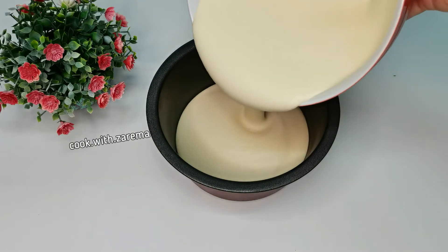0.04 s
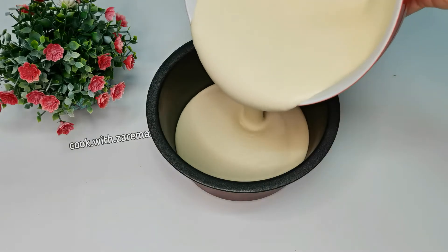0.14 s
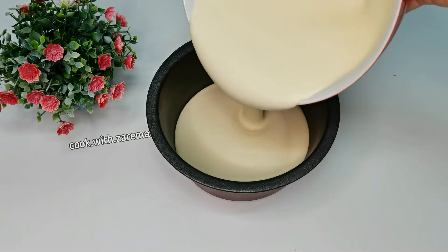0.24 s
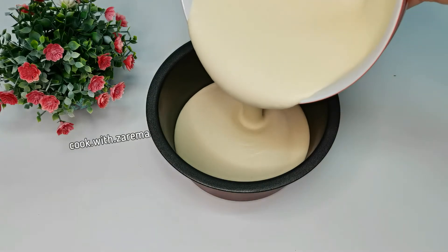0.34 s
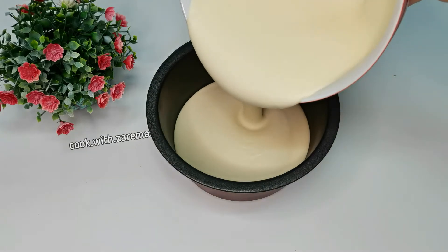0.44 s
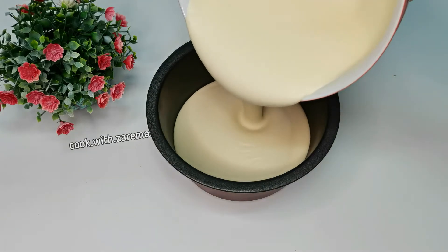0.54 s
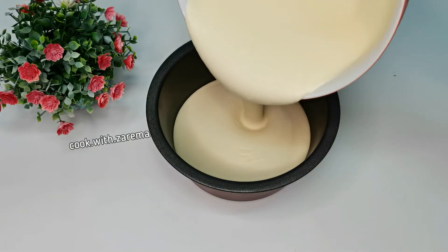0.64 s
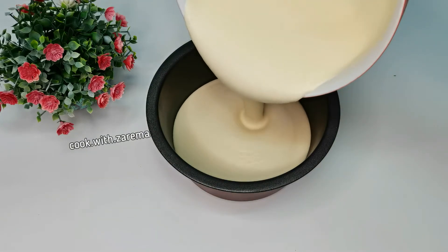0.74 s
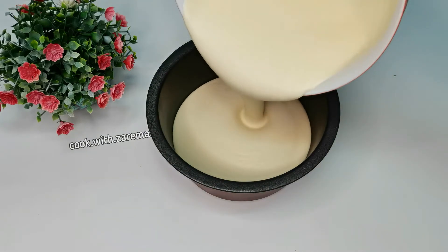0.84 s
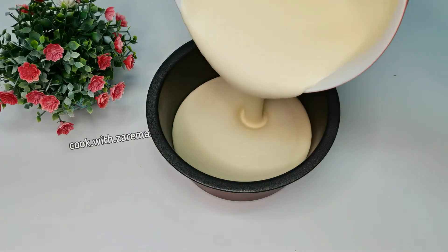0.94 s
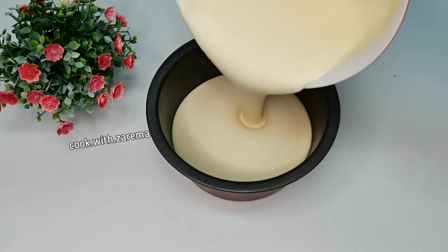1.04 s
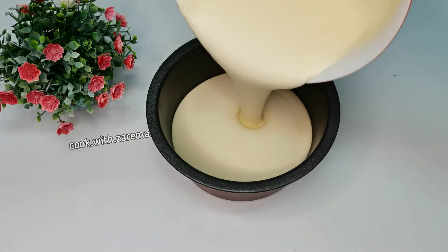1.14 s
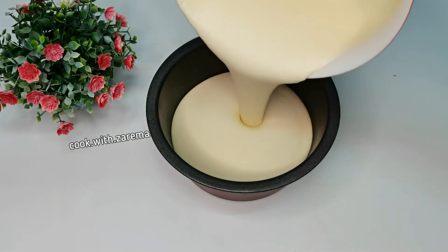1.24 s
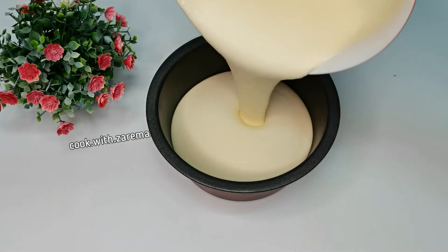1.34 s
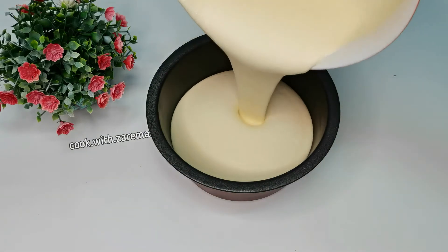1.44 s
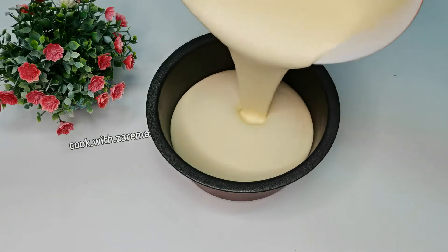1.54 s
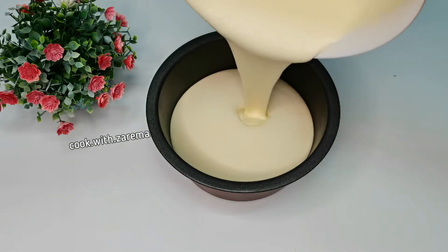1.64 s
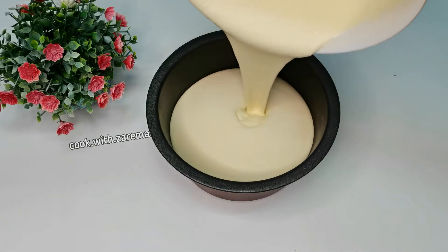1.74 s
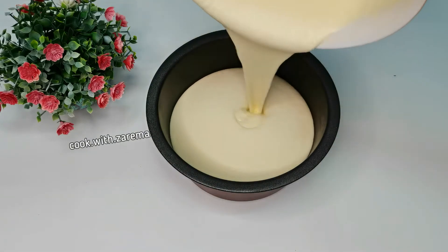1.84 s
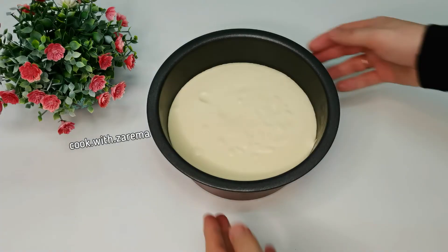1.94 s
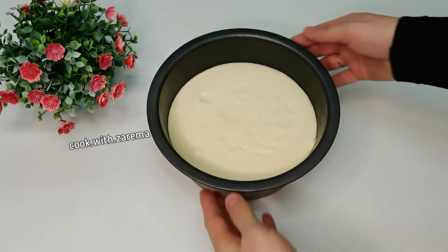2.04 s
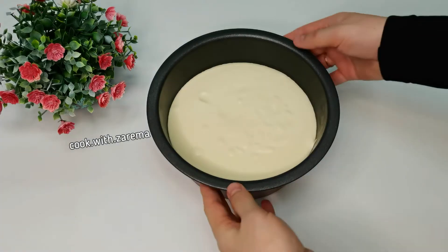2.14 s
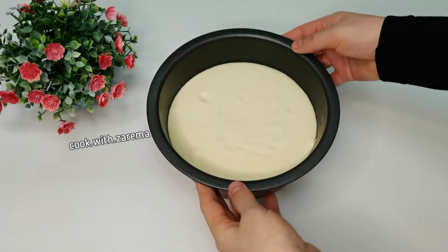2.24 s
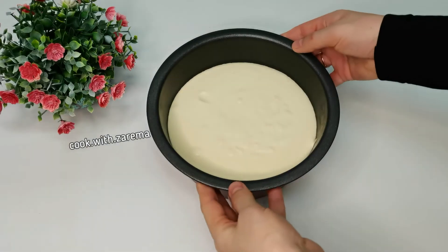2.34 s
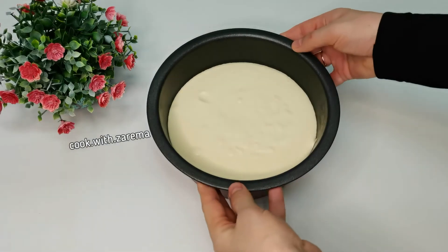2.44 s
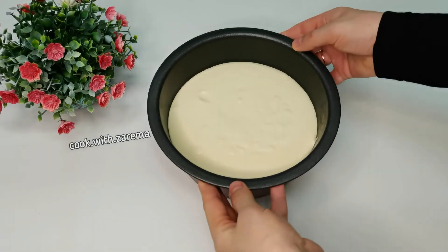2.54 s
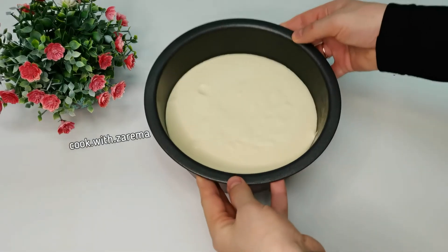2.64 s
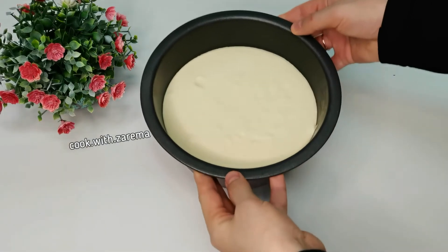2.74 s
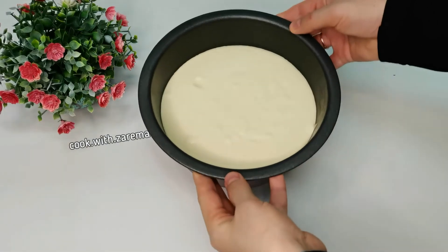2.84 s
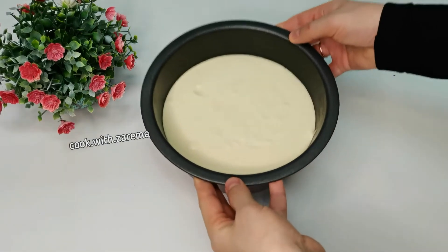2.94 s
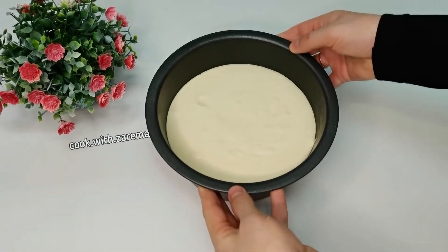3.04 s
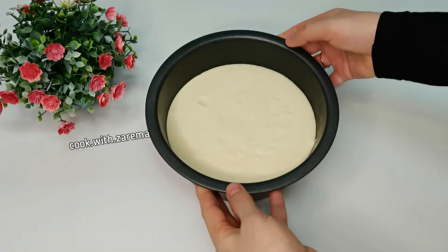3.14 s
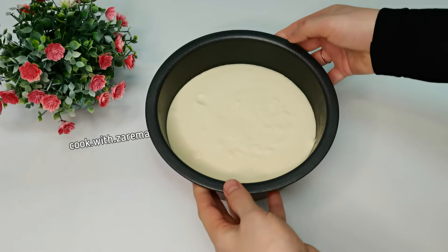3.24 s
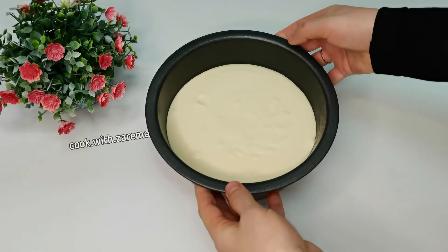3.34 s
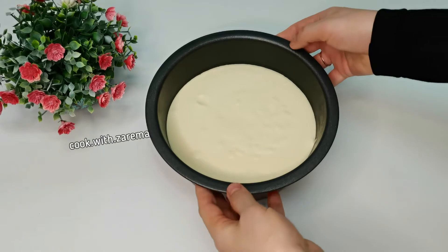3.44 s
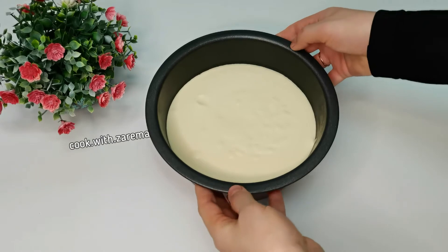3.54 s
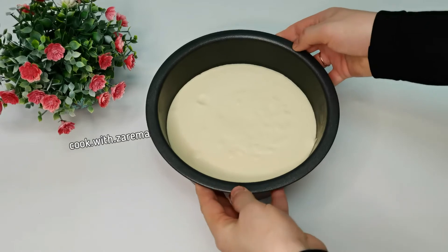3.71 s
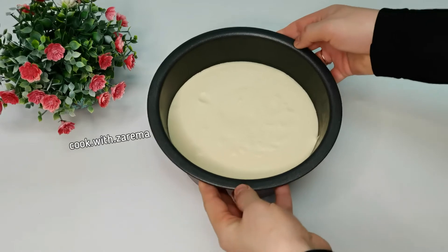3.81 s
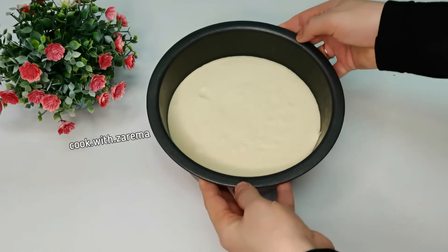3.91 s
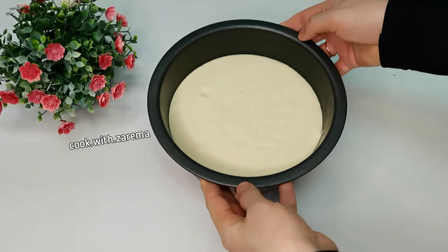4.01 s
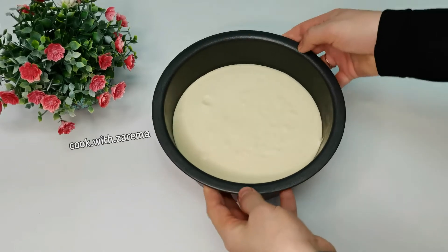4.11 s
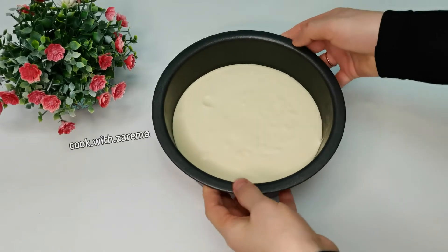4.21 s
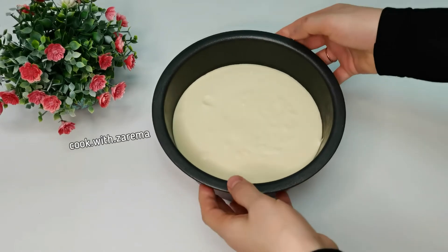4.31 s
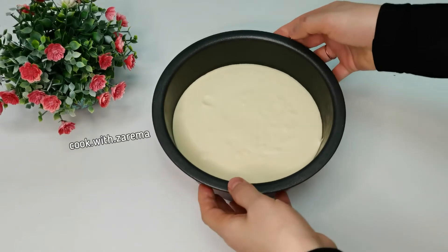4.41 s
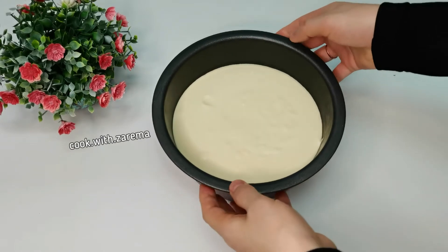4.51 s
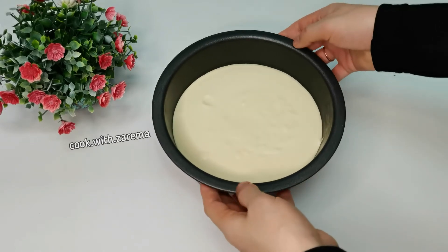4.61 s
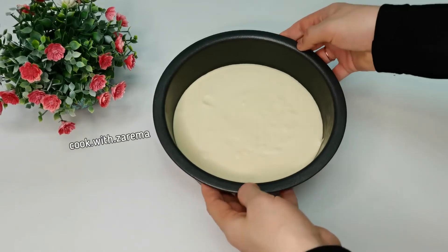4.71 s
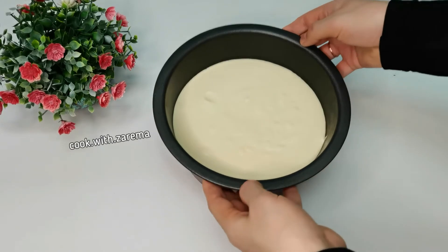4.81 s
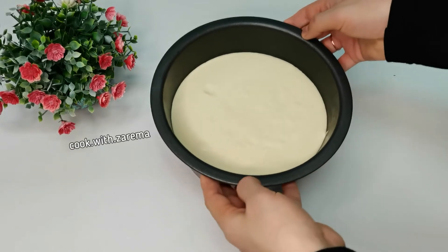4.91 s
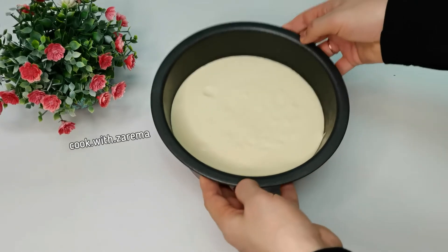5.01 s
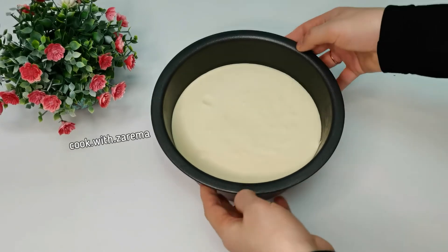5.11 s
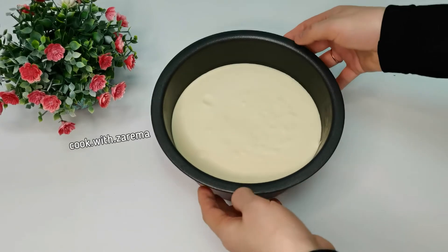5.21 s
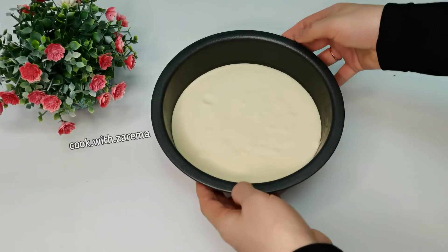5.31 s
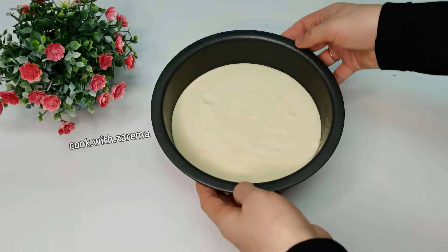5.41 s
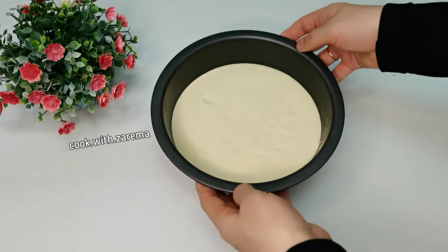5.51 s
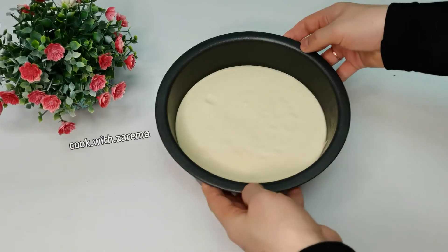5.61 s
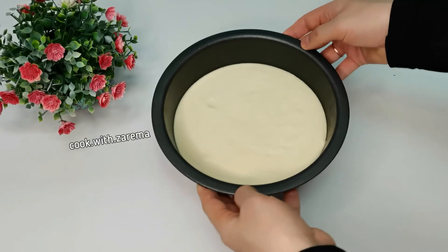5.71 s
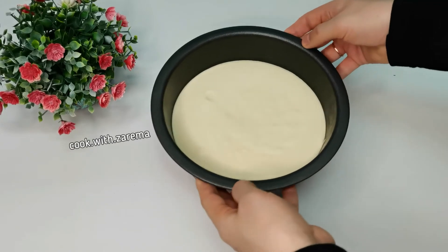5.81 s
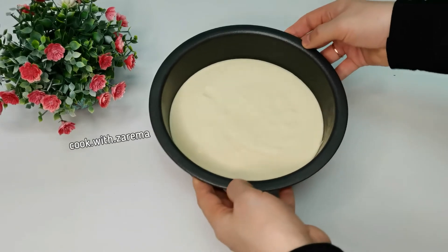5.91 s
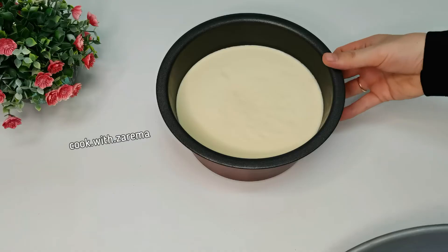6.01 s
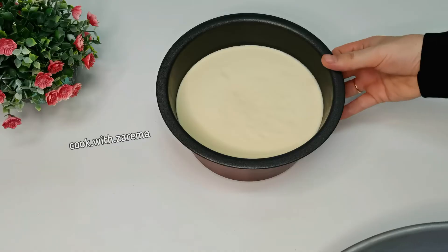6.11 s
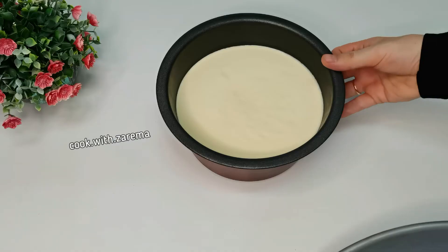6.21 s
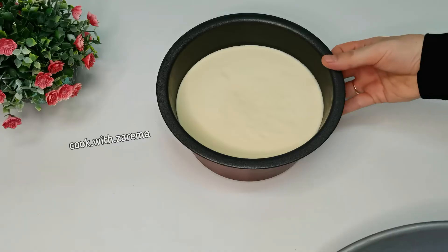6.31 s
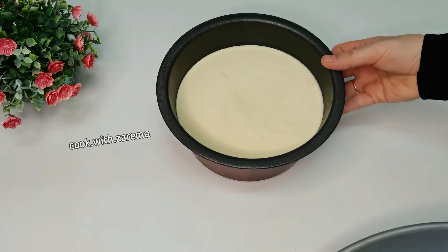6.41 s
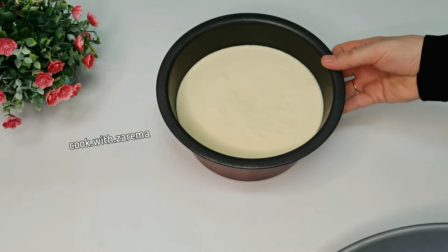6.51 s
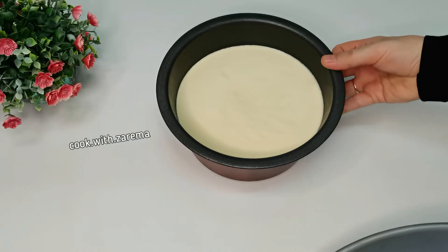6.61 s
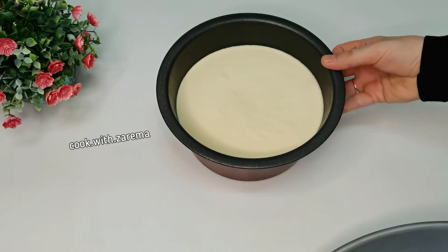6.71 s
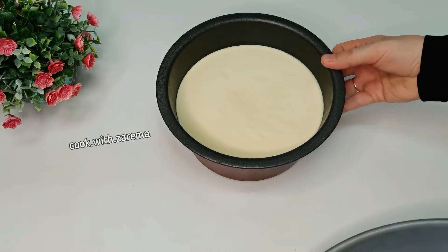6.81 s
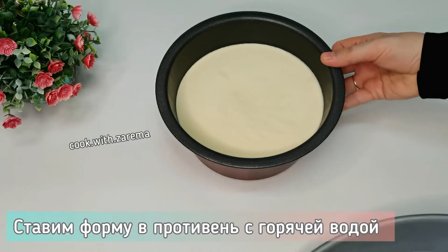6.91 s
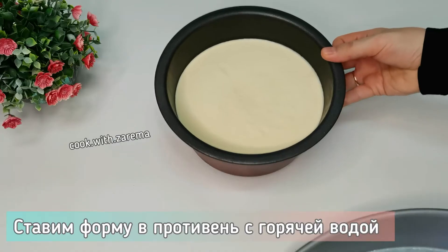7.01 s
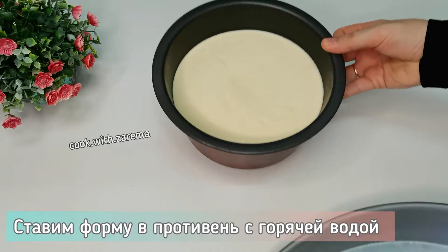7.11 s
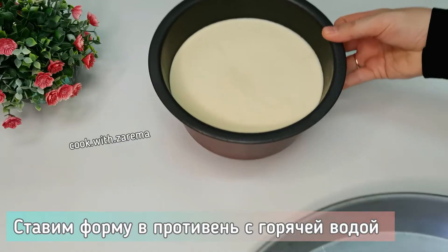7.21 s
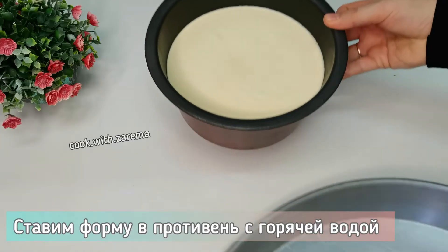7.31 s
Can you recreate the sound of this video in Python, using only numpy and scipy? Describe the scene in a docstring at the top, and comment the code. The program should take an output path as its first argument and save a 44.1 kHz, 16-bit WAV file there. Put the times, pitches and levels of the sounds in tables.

```python
"""An appliance hums, whistles and whines faintly in a bare kitchen: noise, motor lines and a wavering drone.
Hands rustle as they reach for a metal cake pan full of batter: two soft swells of hiss.
The pan is knocked down three times on a table: a low thud, a rattle of tiny contacts and ringing modes,
with echoes and a diffuse tail on thud and rattle; a limiter ducks the loud blows.
The background sinks a step after each knock and comes back near the end with a stronger whine and whistle."""
import sys
import numpy as np
from scipy import signal
from scipy.fft import rfft, irfft
from scipy.io import wavfile
from scipy.ndimage import uniform_filter1d, minimum_filter1d

SR = 44100
rng = np.random.default_rng(int(sys.argv[2]) if len(sys.argv) > 2 else 0)


def inscribe(sig):
    """Save sig as 16-bit PCM at rate SR to the path in sys.argv[1].

    A 1-D sig is mono; a 2-D sig holds one channel per row.
    Samples are clipped to [-1, 1] before scaling.
    """
    pcm = np.round(np.clip(np.atleast_2d(sig).T, -1, 1) * 32767)
    wavfile.write(sys.argv[1], SR, pcm.astype(np.int16))


N = 324135
TIME = np.arange(N) / SR
HZ = np.maximum(np.fft.rfftfreq(2 * SR, 1 / SR), 1)   # bins of a two-second spectrum
FINE_HZ = np.maximum(np.fft.rfftfreq(N, 1 / SR), 1)   # bins of the whole scene

# Pan base on the table. Each row: start in seconds, thud level in dB, contact brightness in Hz,
# pan ring in dB, table boom in dB.
KNOCK_ROWS = [(2.9941, 21.5, 1140, 2, -0.5), (4.0733, 20.5, 770, 1, 4), (5.048, 21, 1000, 1, 6)]


def from_db(db):
    """Decibels to gain."""
    return 10 ** (np.asarray(db) / 20)


def rms_one(x):
    """Scale to an rms of one."""
    return x / np.sqrt(np.mean(x ** 2))


def unit_energy(x):
    """Scale a burst to an energy of one."""
    return x / np.sqrt(np.sum(x ** 2))


def at_hz(points, hz):
    """Read a table on a log-frequency axis."""
    point_hz, value = np.transpose(points)
    return np.interp(np.log(hz), np.log(point_hz), value)


def low_pass(x, hz, order):
    """Butterworth low-pass."""
    sos = signal.butter(order, min(hz, SR / 2 - 10), fs=SR, output="sos")
    return signal.sosfilt(sos, x)


def add(track, start_s, sound):
    """Mix a sound in at a time."""
    start = round(start_s * SR)
    track[..., start:start + sound.shape[-1]] += sound[..., :N - start]


def response(points, size=4096):
    """Causal (minimum-phase) impulse response with the given spectrum, by folding the cepstrum."""
    cepstrum = irfft(np.log(from_db(at_hz(points, HZ))))
    folded = 2 * cepstrum[:SR] * (np.arange(SR) > 0)
    return irfft(np.exp(rfft(folded, 2 * SR)))[:size]


def pan(hz):
    """Left and right gains: the bass leans to the right."""
    # Left against right. Each row: frequency in Hz, difference in dB.
    balance = [(60, -5), (110, -4.5), (200, -2), (380, -2.5), (700, 0), (15000, -0.5)]
    return from_db(np.array([[.5], [-.5]]) * at_hz(balance, hz))


def diffuse(hz):
    """Random stereo spectrum of a diffuse field: alike in the bass, unrelated in the treble."""
    # Each row: frequency in Hz, left-right correlation.
    likeness = [(60, 0.5), (130, 0.86), (290, 0.74), (640, 0.39), (1300, 0), (15000, 0.026)]
    alike = np.clip(at_hz(likeness, hz), -.99, .99)
    mid, side = rng.standard_normal((2, len(hz))) + 1j * rng.standard_normal((2, len(hz)))
    shared = np.sqrt(1 + alike) * mid
    opposed = np.sqrt(1 - alike) * side * [[1], [-1]]
    return pan(hz) * (shared + opposed) / 2


def returned(start_s=5.935, fade_s=0.017):
    """Goes from 0 to 1 as the background comes back."""
    return np.clip((TIME - start_s) / fade_s, 0, 1)


def background_level_db(full_db=3.5, sink_db=2.0, sink_s=.4):
    """Level of the background: a step down after every knock, all undone at the return."""
    steps = sum(np.clip((TIME - knock[0]) / sink_s, 0, 1) for knock in KNOCK_ROWS)
    return full_db - sink_db * steps * (1 - returned())


def change_at_return(before_db, after_db):
    """Gain that moves from one level to another at the return."""
    return from_db(before_db + (after_db - before_db) * returned())


def rush(rms_db=-48.5):
    """Fan rush and room air: diffuse noise with a fixed colour; rms before the background level."""
    # Each row: frequency in Hz, relative level in dB.
    air = [(25, -18), (55, 3.5), (80, -3), (170, -3.5), (350, -0.5), (520, -7.5), (850, -18), (1250, -18),
           (2000, -29), (3000, -33.5), (3700, -29.5), (4900, -41), (8500, -46.5), (13000, -42.5)]
    noise = irfft(diffuse(FINE_HZ) * from_db(at_hz(air, FINE_HZ)), N)
    return from_db(rms_db) * rms_one(noise)


def tones(lines, steady):
    """Motor tones, each a line plus a narrow band of noise; steady = line against waver."""
    clean, waver = np.zeros(len(FINE_HZ), complex), 0
    for centre_hz, level_db, width_hz in lines:
        phase = 2 * np.pi * rng.random()
        clean[round(centre_hz * N / SR)] += from_db(level_db) * np.exp(1j * phase)
        band = 1 / (1 + ((FINE_HZ - centre_hz) / width_hz) ** 2)
        waver = waver + from_db(level_db) * unit_energy(band)
    spectrum = steady * pan(FINE_HZ) * clean + diffuse(FINE_HZ) * waver
    return irfft(spectrum, N) * N / np.sqrt(2) / np.hypot(steady, 1)


def drone(motor_hz=58.8, wander_hz=0.597, size=9000, beat_share=0.34, beat_hz=5.3):
    """Motor harmonics at a slightly unsteady speed; each wavers at random about their common level."""
    # Relative levels in dB of the second and fourth harmonics.
    harmonic_db = [-55, -54]
    # Slow swells and fades. Each row: time in seconds, gain in dB.
    swell = [(0, 7.5), (.12, -3), (.45, 5.5), (.8, 4), (1.02, -5), (1.2, -0.5), (1.9, 0.5), (2.9, -2.5),
             (5.9, 0.5), (6.25, 4), (6.6, -2), (6.85, 4), (7.35, 1.5)]
    wander = rms_one(uniform_filter1d(rng.standard_normal(N), size))
    turn = 2 * np.pi * np.cumsum(motor_hz + wander_hz * wander) / SR
    out = 0
    for k, level_db in zip((2, 4), harmonic_db):
        slow_noise = irfft(rfft(rng.standard_normal(N)) / (1 + (FINE_HZ / beat_hz) ** 4), N)
        beat = beat_share * rms_one(slow_noise)
        harmonic = rms_one((1 + beat) * np.sin(k * turn))
        out = out + from_db(level_db) * pan(k * motor_hz) * harmonic
    return from_db(np.interp(TIME, *np.transpose(swell))) * out


def background():
    """Rush, hum, drone, whistle and thin whine; the last two are stronger after the return."""
    # The appliance's tones. Each row: frequency in Hz, relative level in dB, waver half-width in Hz.
    hum_lines = [(58.5, -61, 4), (178.8, -59, 5.4), (575, -67.5, 20), (1190, -72.5, 19), (2410, -82.5, 14),
                 (2595, -84, 12), (3530, -79, 9.3), (3806, -87.5, 12), (4370, -90, 8), (5530, -94, 6.3)]
    whine_lines = [(2040, -81.5, 14), (3140, -81, 42), (3626, -71, 12), (3800, -80.5, 100), (4000, -79, 25)]
    whistle_lines = [(1497, -69.5, 9)]
    hum = tones(hum_lines, steady=0.73)
    whine = change_at_return(before_db=-12, after_db=-1) * tones(whine_lines, steady=1.35)
    whistle = change_at_return(before_db=-1, after_db=1.5) * tones(whistle_lines, steady=1.9)
    return from_db(background_level_db()) * (rush() + hum + whistle + whine + drone())


def rustles(width_hz=1800):
    """Hands reach for the pan and grip it: soft swells of band-limited hiss."""
    # Each row: centre time in seconds, peak rms in dB, length in seconds, centre frequency in Hz.
    swishes = [(1.964, -66, 0.1, 3800), (2.17, -75, 0.065, 9500)]
    out = 0
    for centre_s, level_db, length_s, centre_hz in swishes:
        band = 1 / (1 + ((FINE_HZ - centre_hz) / width_hz) ** 2)
        hiss = rms_one(irfft(diffuse(FINE_HZ) * band, N))
        out = out + from_db(level_db) * hiss * np.exp(-((TIME - centre_s) / length_s) ** 2)
    return out


def thuds(bend_hz=650, bend_width_hz=900):
    """The heavy pan gives the table one push; a flatter, softer landing is duller."""
    # Table top's answer to a push. Each row: frequency in Hz, relative level in dB.
    push_colour = [(20, -37), (40, -16), (60, -13), (90, -4.5), (180, -4.5), (270, 4.5), (480, -1),
                   (700, 1), (950, -5), (1400, -10), (2000, -15), (3000, -19.5), (5000, -29), (15000, -50)]
    out = np.zeros((2, N))
    # all-pass: bending waves travel at unequal speeds and draw the push out into a few swings
    radius = np.exp(-np.pi * bend_width_hz / SR)
    poles = [1, -2 * radius * np.cos(2 * np.pi * bend_hz / SR), radius ** 2]
    table = signal.lfilter(poles[::-1], poles, response(push_colour))
    for start_s, level_db, contact_hz, _, _ in KNOCK_ROWS:
        push = unit_energy(low_pass(table, contact_hz, order=2))
        add(out, start_s, -from_db(level_db) * push)
    return out


def rattles(size=8192, count=4):
    """A quickly dying swarm of tiny metal contacts all round the base, different on each side."""
    # Base chatter on landing. Each row: start in seconds, level in dB, t60 in seconds, brightness in Hz.
    chatter = [(2.9945, 5, 0.016, 14100), (3.0356, 8.5, 0.03, 6030), (3.043, 0, 0.014, 11930),
               (4.0732, 3, 0.11, 12000), (5.048, 12.5, 0.26, 5360)]
    # Colour of the metal contacts. Each row: frequency in Hz, relative level in dB.
    metal_colour = [(300, 0), (1200, 3), (1900, 1.5), (2500, -0.5), (3200, -6), (4300, -7), (5200, -14),
                    (7300, -13.5), (11000, -19), (15500, -25)]
    out, metal = np.zeros((2, N)), response(metal_colour)
    for start_s, level_db, t60_s, bright_hz in chatter:
        fade = from_db(-60 * TIME[:size] / t60_s)
        for side in out:
            contacts = rng.standard_normal(size) * fade
            for _ in range(count):   # flatten the spectrum so no pitch stands out, keep the swarm short
                flat = irfft(np.exp(1j * np.angle(rfft(contacts))))
                contacts = flat * fade ** (1 / count)
            swarm = low_pass(signal.fftconvolve(contacts, metal), bright_hz, order=1)
            add(side, start_s, from_db(level_db) * unit_energy(swarm))
    return out


def ringing(scatter_db=1.06, spread_hz=800, swell_s=0.0024):
    """Every knock rings the same modes; the higher ones reach the two sides out of step."""
    # Pan and table together. Each row: frequency in Hz, relative level in dB, t60 in seconds.
    modes = [(104, -22, .35), (117, -14.5, .5), (149, -27, .5), (175, -16.5, .42), (256, -21.5, .72),
             (267, -21.5, .72), (290, -25, .65), (308, -24, .65), (335, -18, .68), (365, -23, .65),
             (408, -25.5, .55), (458, -23, .55), (492, -28, .5), (555, -29, .55), (600, -22, .58),
             (689, -27, .5), (744, -25.5, .65), (818, -28, .55), (899, -25.5, .62), (969, -29, .6),
             (1168, -28, .68), (1197, -33, .55), (1316, -35, .6), (1575, -37.5, .5), (1732, -36.5, .55),
             (1935, -37.5, .4), (2420, -44, .4)]
    out, t = np.zeros((2, N)), TIME[:SR]
    for start_s, _, contact_hz, ring_db, boom_db in KNOCK_ROWS:
        for k, (hz, mode_db, t60_s) in enumerate(modes):
            strength, skew = rng.standard_normal(2)
            phase = skew * min(hz / spread_hz, 2) * np.array([[.5], [-.5]])
            # how hard the table's second pair of modes booms depends on where the pan lands
            blow_db = boom_db if 140 < hz < 200 else ring_db
            softness = np.hypot(1, hz / contact_hz / 2)
            gain = (-1) ** k * from_db(blow_db + mode_db + scatter_db * strength) / softness
            envelope = from_db(-60 * t / t60_s) * (1 - np.exp(-t / swell_s))
            add(out, start_s, gain * pan(hz) * np.sin(2 * np.pi * hz * t + phase) * envelope)
    return out


def kitchen(x, echo_db, tail_db, build_s, count=18):
    """Direct sound, three near echoes, and a diffuse tail whose treble dies first."""
    # Near surfaces. Each row: delay in seconds, left level in dB, right level in dB.
    echoes = [(.0042, -18, -10), (.0072, -25, -13), (0.01, -11, -7.5)]
    # Reverberant colour. Each row: frequency in Hz, relative level in dB.
    tail_colour = [(60, 1), (120, -7.5), (200, -7), (340, -3), (700, -3.5), (1400, 5), (3000, 7), (6000, 6),
                   (14000, 1)]
    # Reverberation time. Each row: frequency in Hz, t60 in seconds.
    tail_t60 = [(80, 0.54), (300, 0.72), (1000, 0.72), (2700, 0.64), (4200, 0.59), (7000, 0.48),
                (14000, 0.32)]
    t, tail = TIME[:SR], 0
    field = diffuse(HZ) * from_db(at_hz(tail_colour, HZ))
    centres_hz = np.geomspace(50, 16000, count)
    for hz, share in zip(centres_hz, np.eye(count)):   # overlapping triangular bands
        weight = np.interp(np.log(HZ), np.log(centres_hz), share)
        band = irfft(field * weight)[:, :SR]
        tail = tail + band * from_db(-60 * t / at_hz(tail_t60, hz))
    impulse = tail * from_db(tail_db) * (1 - np.exp(-t / build_s))
    impulse[:, 0] += 1   # direct sound
    for delay_s, left_db, right_db in echoes:
        impulse[:, round(delay_s * SR)] += from_db(echo_db) * from_db([left_db, right_db])
    return signal.fftconvolve(x, impulse, axes=1)[:, :N]


def scene():
    """Knocks over the appliance; the wide table top stirs the room more than the pan does."""
    table = kitchen(thuds(), echo_db=-2.0, tail_db=21.0, build_s=0.0044)
    metal = kitchen(rattles(), echo_db=-4, tail_db=15.5, build_s=0.02)
    return background() + rustles() + table + metal + ringing()


def limiter(x, threshold_db=-11.0, attack_s=0.0068, release_db_per_s=90, size=350):
    """The gain ducks when the level passes a threshold and climbs back steadily."""
    power = signal.lfilter(np.ones(size) / size, 1, np.mean(x ** 2, axis=0))
    over_db = np.maximum(10 * np.log10(power + 1e-12) - threshold_db, 0)
    release_db = release_db_per_s * TIME
    held_db = np.maximum.accumulate(over_db + release_db) - release_db
    r = np.exp(-1 / (attack_s * SR))
    return x * from_db(-signal.lfilter([1 - r], [1, -r], held_db))


def catch_peaks(x, size=101):
    """A brief, smooth dip in gain keeps each peak within full scale."""
    room_left = 1 / np.maximum(np.abs(x).max(axis=0), 1)
    return x * uniform_filter1d(minimum_filter1d(room_left, size), size)


def record(dry, cutoff_hz=15750):
    """Limiter, peak catcher, steep top cut."""
    level = .98 * catch_peaks(limiter(dry))
    top_cut = signal.ellip(12, .1, 80, cutoff_hz, fs=SR, output="sos")
    return signal.sosfilt(top_cut, level)


dry = scene()
out = record(dry)
inscribe(out)
```